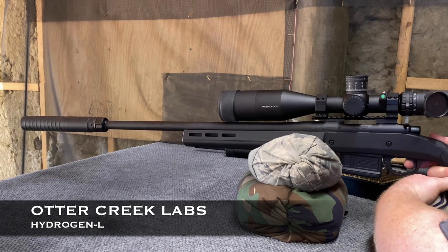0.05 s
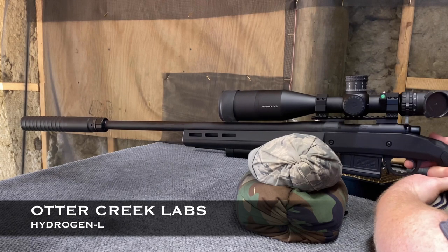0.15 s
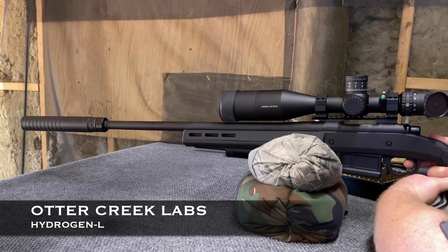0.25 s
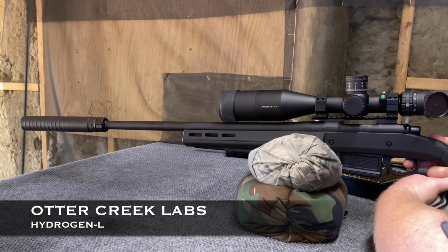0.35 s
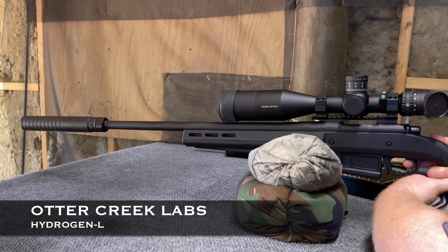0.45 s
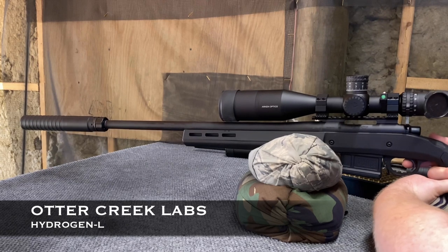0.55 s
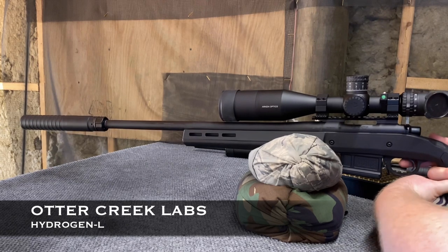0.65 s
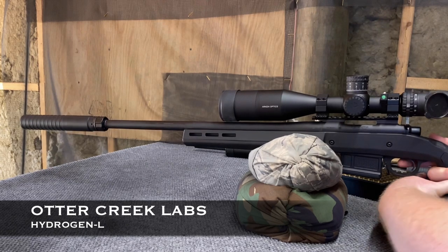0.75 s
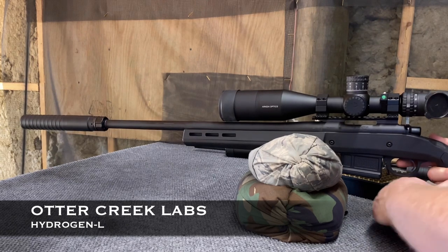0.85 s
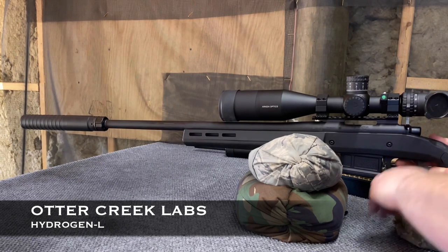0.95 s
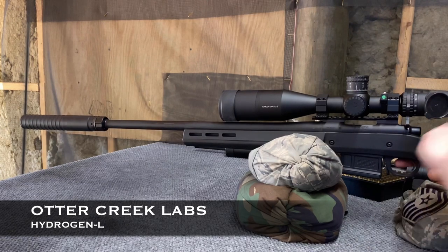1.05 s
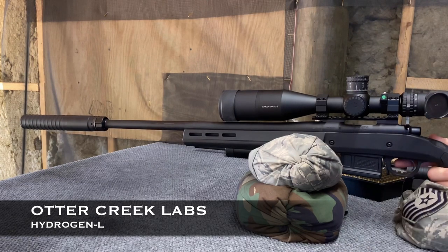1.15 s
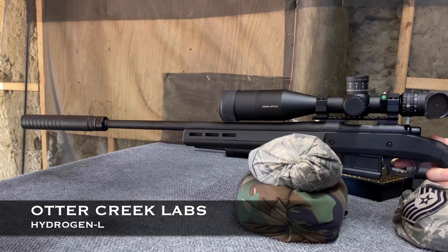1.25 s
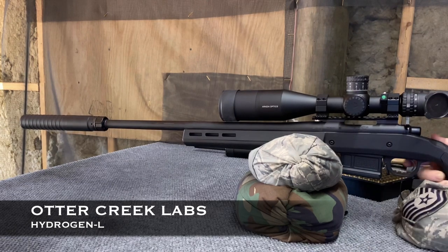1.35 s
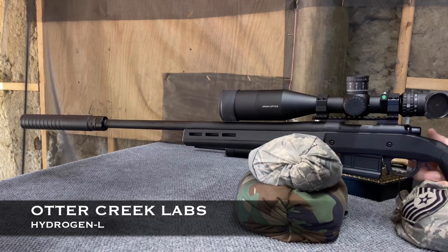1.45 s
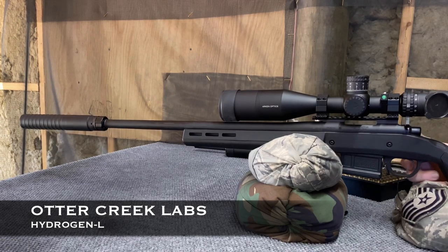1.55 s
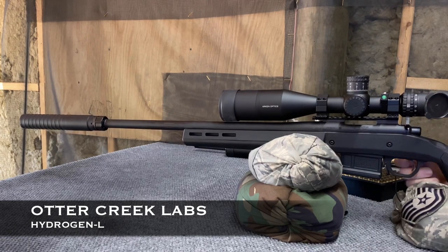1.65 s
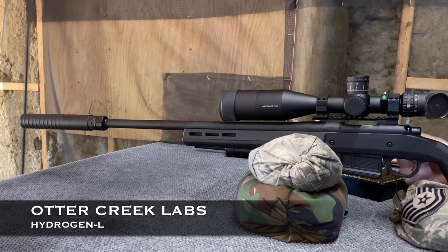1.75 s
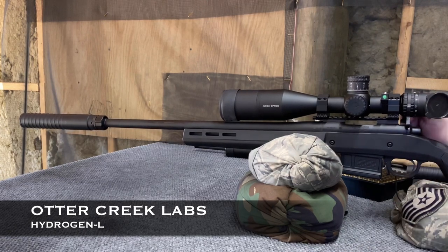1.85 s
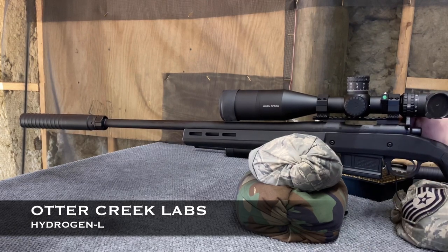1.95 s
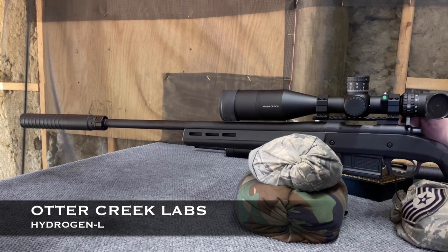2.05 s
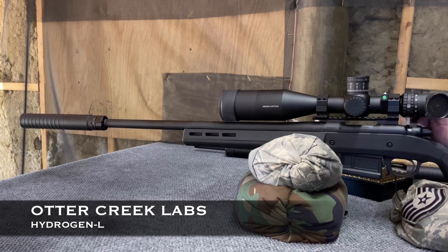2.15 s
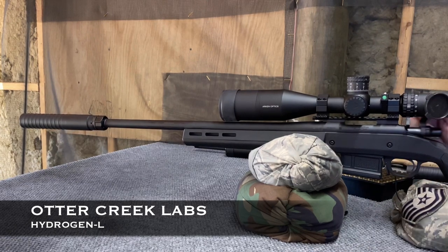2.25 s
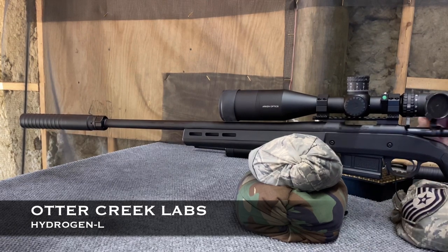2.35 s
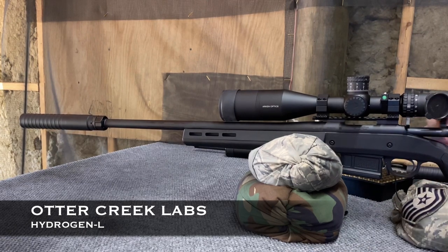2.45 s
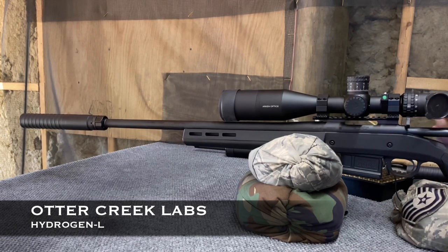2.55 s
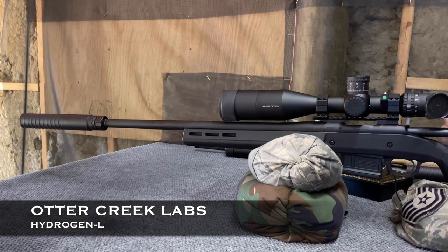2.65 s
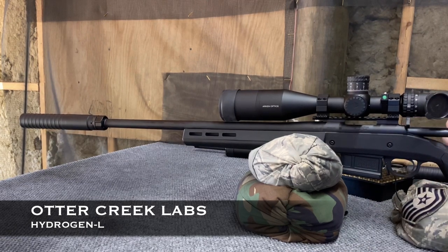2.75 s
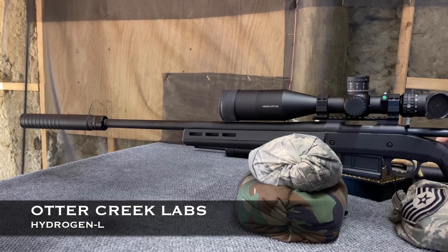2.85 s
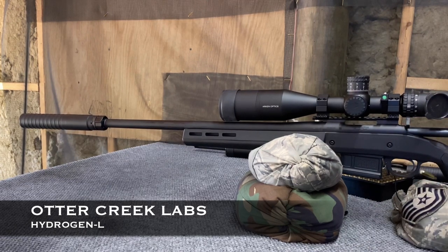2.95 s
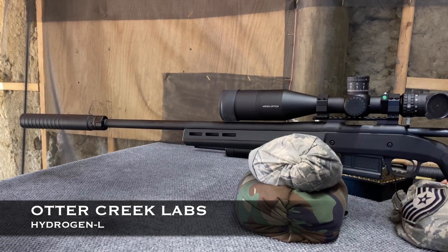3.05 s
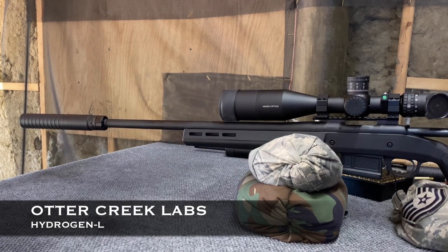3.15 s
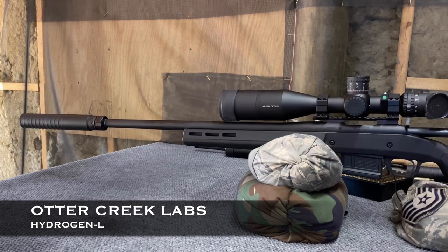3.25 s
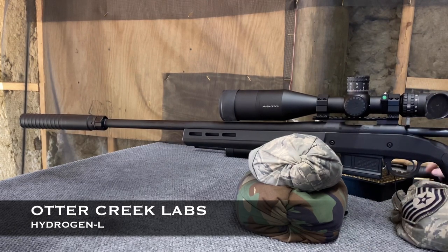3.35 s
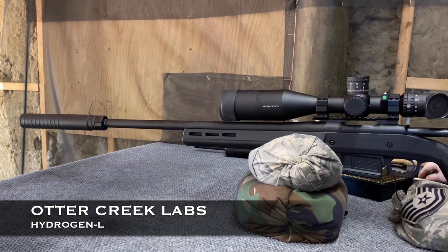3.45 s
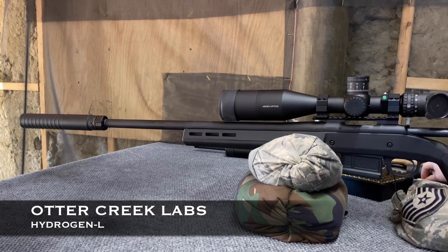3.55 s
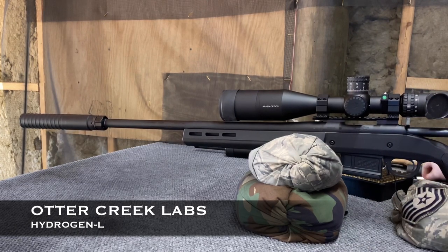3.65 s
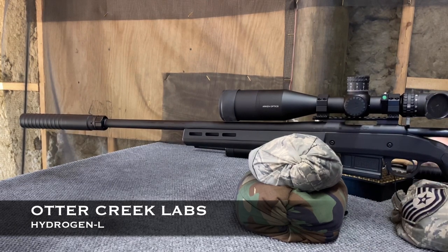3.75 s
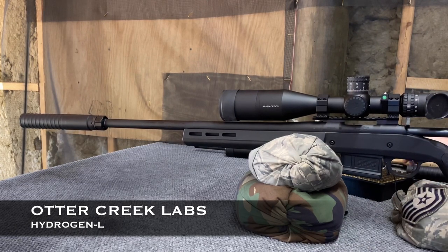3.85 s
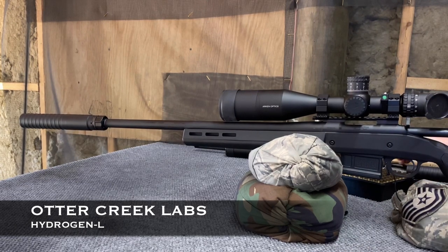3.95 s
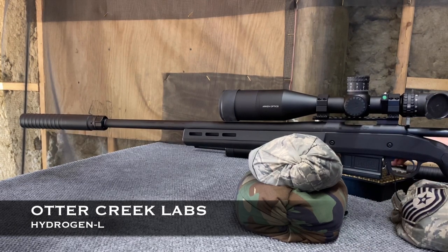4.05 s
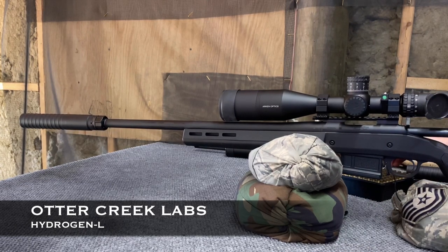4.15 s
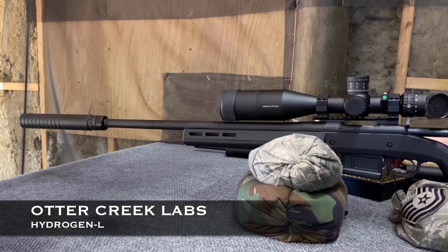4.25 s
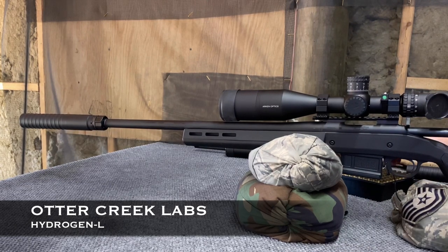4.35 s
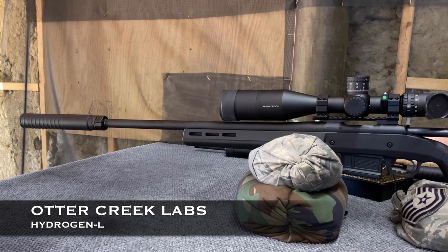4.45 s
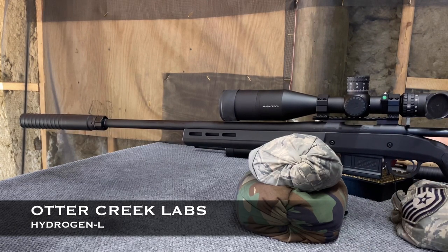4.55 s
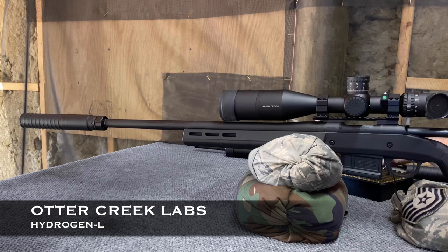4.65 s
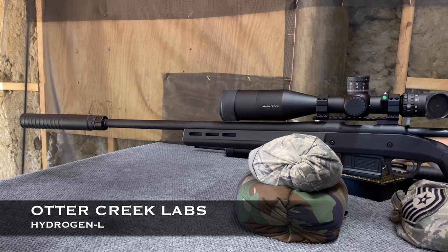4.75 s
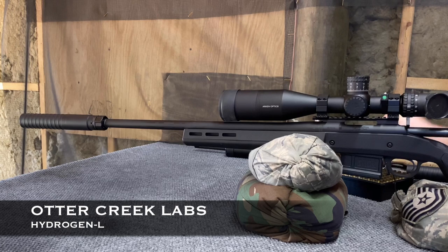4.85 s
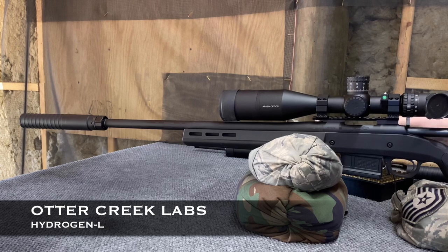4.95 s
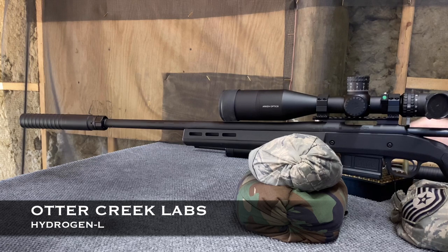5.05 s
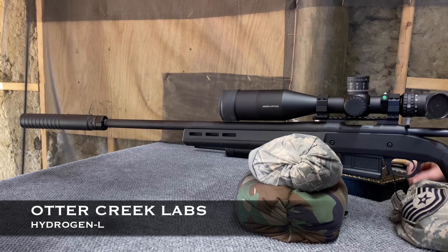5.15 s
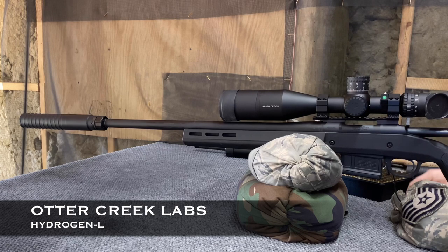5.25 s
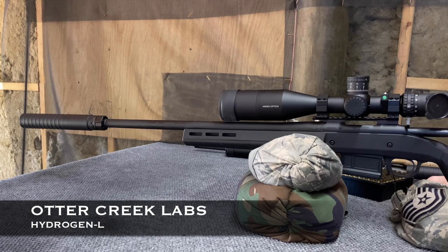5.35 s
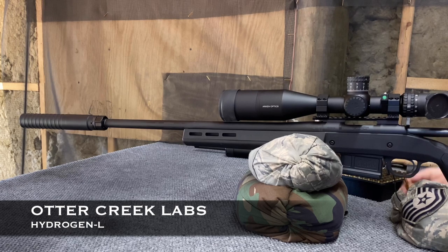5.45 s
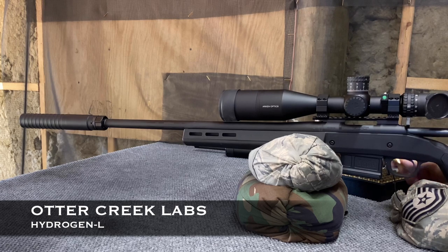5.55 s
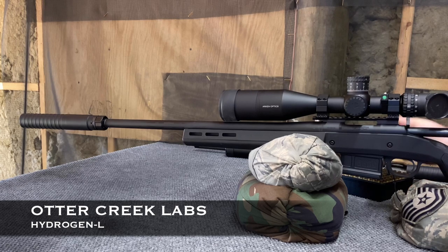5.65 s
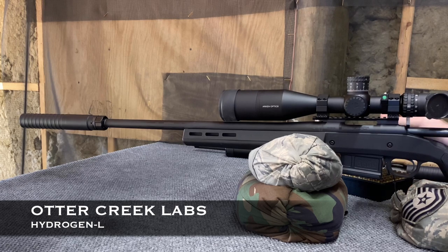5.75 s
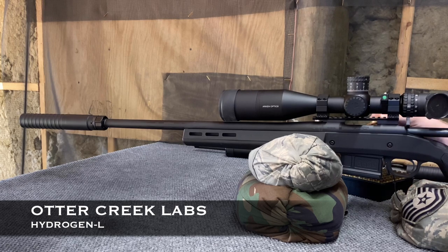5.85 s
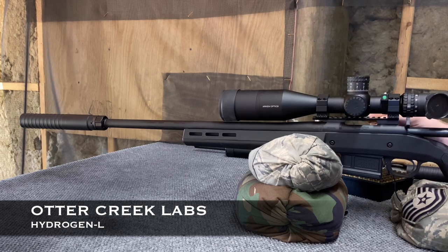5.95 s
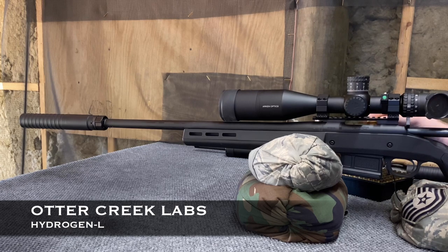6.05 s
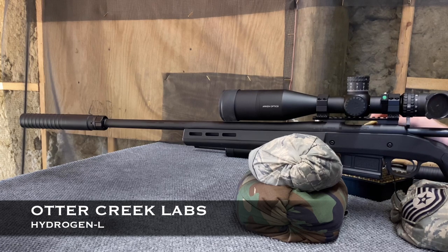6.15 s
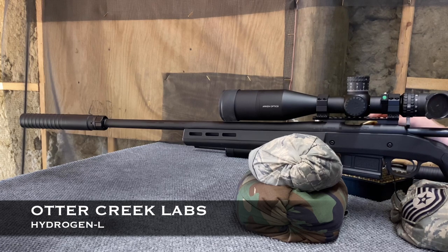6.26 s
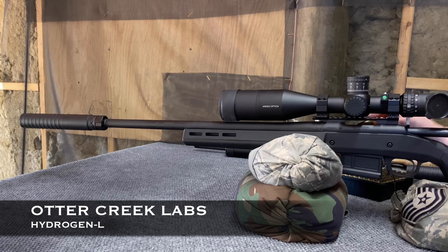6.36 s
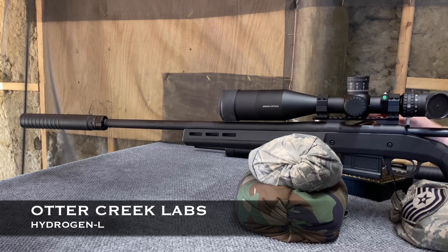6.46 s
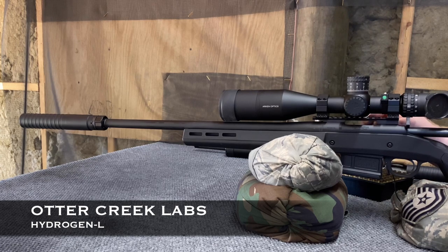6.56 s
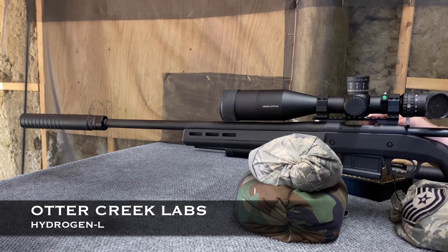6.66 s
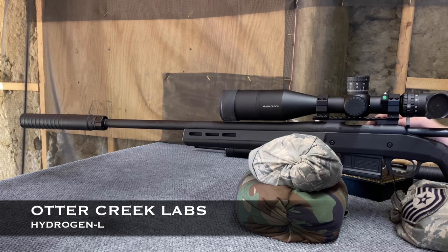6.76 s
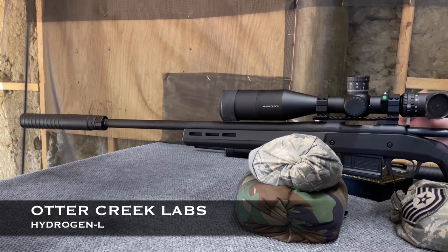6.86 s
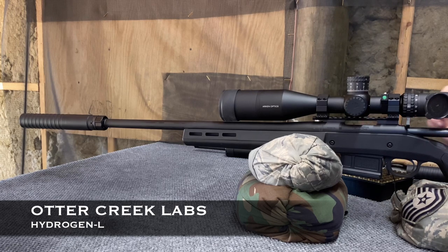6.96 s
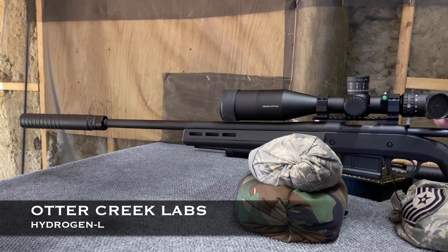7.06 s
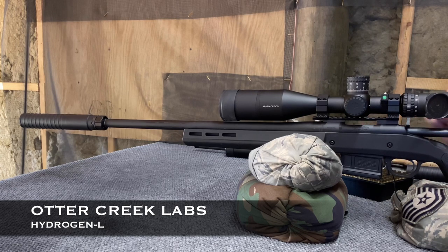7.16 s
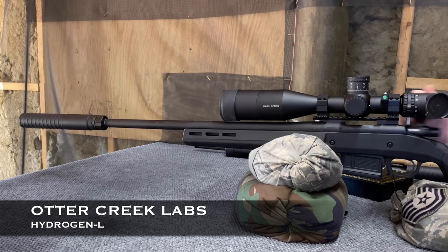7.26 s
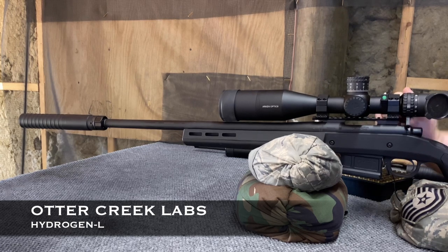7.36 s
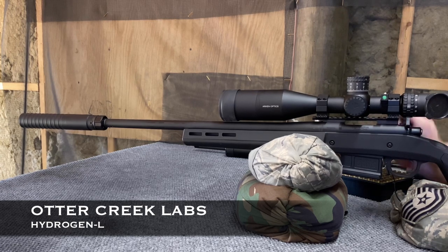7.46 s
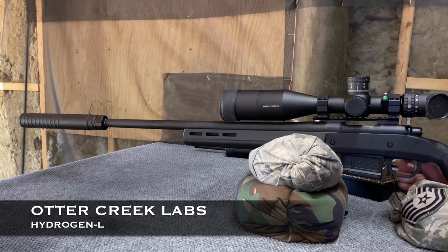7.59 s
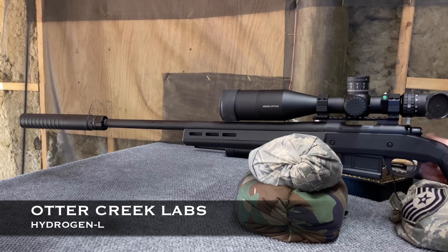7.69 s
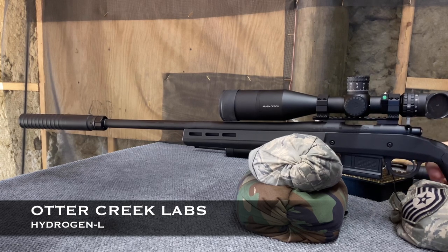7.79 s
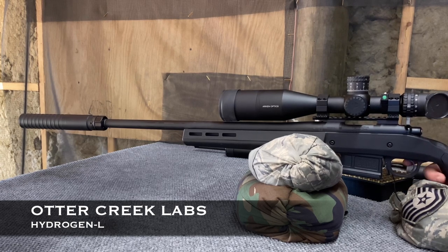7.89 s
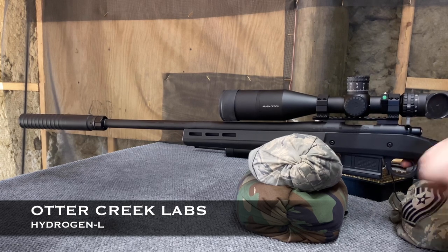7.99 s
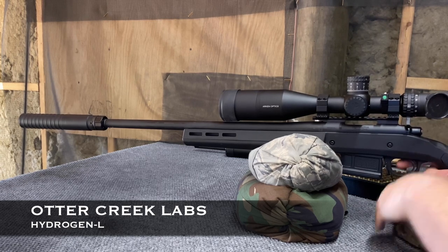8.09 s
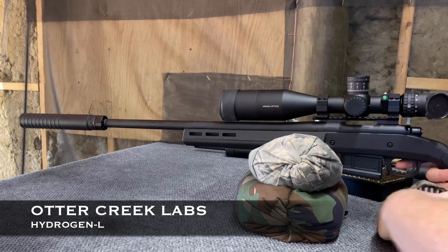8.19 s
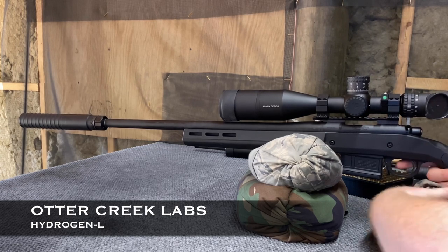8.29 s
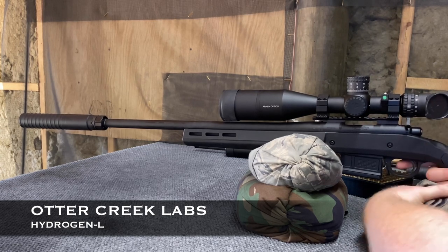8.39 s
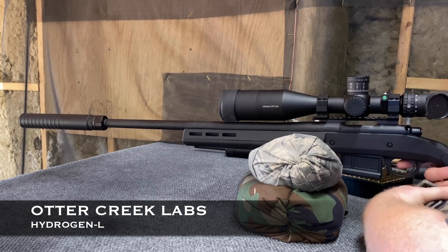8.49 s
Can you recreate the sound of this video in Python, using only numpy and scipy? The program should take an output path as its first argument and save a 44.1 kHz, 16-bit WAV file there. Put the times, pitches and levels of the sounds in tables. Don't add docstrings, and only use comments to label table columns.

```python
import sys
import numpy as np
from scipy import signal
from scipy.fft import rfft, irfft, next_fast_len
from scipy.io import wavfile
from scipy.ndimage import uniform_filter1d

SR = 44100
rng = np.random.default_rng(int(sys.argv[2]) if len(sys.argv) > 2 else 0)


def int16_out(signal):
    q = np.round(np.clip(np.atleast_2d(signal).T, -1, 1) * 32767)
    wavfile.write(sys.argv[1], SR, q.astype(np.int16))


def voltage_ratio(level):
    return 10 ** (np.asarray(level, float) / 20)


N = 375985

# start in seconds, steel, stock and tick levels in dB, steel pitch in Hz.
OPENING = [(1.6675, -32.5, -34.5, -45.5, 2360), (1.7578, -20.5, -28.5, -23.5, 2620),
           (1.7655, -8, -22.5, -18.5, 3000), (1.9893, -18, -29.5, -20.5, 3000),
           (2.2618, -15.5, -26.5, -27.5, 2400), (2.2652, -22, -35, -30.5, 3540),
           (2.2842, -11, -39.5, -14.5, 2320), (2.2875, -26, -36, -26, 5800),
           (2.4265, -19.5, -32, -38, 5400), (2.4733, -19, -36, -35.5, 3100), (2.586, -18, -26, -16, 5310),
           (2.6662, -13, -5.5, -23, 2060), (2.6745, -24, -14, -42, 2300), (2.6855, -32.5, -28, -51.5, 2290),
           (2.6992, -46, -20.5, -60.5, 2100), (2.719, -52, -35.5, -64, 2300),
           (2.9492, -40.5, -35.5, -70, 3302)]
FEEDING = [(4.1842, -41.5, -26, -50.5, 5650), (4.3772, -48, -32, -59.5, 5850),
           (4.7112, -49.5, -39, -56, 3980), (4.7295, -51, -34, -38, 6600), (4.7352, -21, -7, -33.5, 5000),
           (4.7512, -40, -34, -36, 5400), (4.7592, -49, -21, -52, 2900), (4.8332, -50.5, -42.5, -62, 2800)]
CLOSING = [
    (6.036, -43.5, -55, -49.5, 2990),
    (6.0545, -51.5, -60, -48, 3030),
    (6.2992, -30.5, -41, -56, 2260),
    (6.463, -49.5, -40.5, -63.5, 3000),
    (6.4685, -15, -6.5, -30, 3160),
    (6.474, -39, -18.5, -34, 2300),
    (6.4802, -29.5, -38, -39.5, 4550),
    (6.493, -38, -20, -41, 2900),
    (6.505, -51, -54.5, -60, 3000),
]
LOCKING = [(7.1055, -24, -39.5, -16.5, 2610), (7.154, -46, -47.5, -21.5, 3000),
           (7.1712, -12.5, -26, -21.5, 2690), (7.217, -30, -39.5, -28, 4500),
           (7.2287, -4.5, -20.5, -3.5, 2950), (7.2303, 0.5, -17.5, -7, 5810),
           (7.2312, -13, -21, -19.5, 3313), (7.2402, -31, -32, -25.5, 2400),
           (7.3442, -34.5, -40, -49, 2900), (7.3735, -15.5, -38, -18.5, 2970),
           (7.3795, -21, -47, -41.5, 2486), (7.4455, -4, -13, -18.5, 3050),
           (7.4665, -48, -32.5, -51.5, 3000)]
# start in seconds, level in dB.
TOUCHES = [
    (1.7422, -32.5),
    (2.2162, -41),
    (2.4452, -27.5),
    (2.6152, -36),
]
# start in seconds, level in dB.
SCUFFS = [(4.1423, -31), (4.1555, -34.5), (4.1903, -41), (4.1968, -30.5), (4.203, -53), (4.2235, -37),
          (4.2274, -30.5), (4.2354, -38), (4.249, -54), (4.2689, -32), (4.286, -50.5), (4.3338, -40.5),
          (4.3575, -41.5), (4.365, -47), (4.383, -42), (4.416, -47.5), (4.4541, -60), (4.508, -64.5),
          (4.5266, -50), (4.54, -51), (4.5542, -41), (4.563, -41), (4.573, -44), (4.592, -52.5),
          (4.619, -52.5), (4.6626, -48), (4.6874, -52), (4.699, -45), (5.1125, -46.5)]
# start in seconds, level in dB.
RATTLE = [(7.0592, -41), (7.0702, -34), (7.0872, -35), (7.112, -33), (7.1212, -26.5), (7.134, -27.5),
          (7.1402, -25.5), (7.1462, -25.5), (7.1532, -44), (7.1612, -29.5), (7.1662, -24.5),
          (7.1772, -24.5), (7.1832, -29.5), (7.194, -33), (7.1992, -34.5), (7.209, -29.5), (7.2162, -26)]
# steel, stock and tick levels in dB, then steel pitch in Hz.
TOUCH_MIX = [0.5, -21, -31.5, 2999.5]
SCUFF_MIX = [-20, 2.5, -29.5, 5601]
RATTLE_MIX = [3, -6.5, -16.5, 2795]
# frequency in Hz, level in dB per Hz.
STEEL = [(1350, -31), (2100, -3), (3000, 1.5), (4300, -1.5), (5800, -5), (7200, -17), (9100, -35.5),
         (15400, -120)]
EDGES = [(4120, -35), (7000, -12), (7820, 0.5), (9660, -3), (10600, -3), (12000, -3.5), (14500, -10.5),
         (15100, -10.5), (16000, -40)]
# frequency in Hz, level in dB per Hz.
STOCK_OPENING = [(290, -61.5), (500, -25.5), (899, 1.5), (970, -15.5), (1070, -5), (1470, -6.5), (1730, -8),
                 (2130, -4.5), (2600, -13), (3380, -35), (5720, -120)]
STOCK_FEEDING = [(290, -79.5), (500, -28), (711, -18), (1230, 1.5), (1430, -22.5), (1700, -2.5),
                 (1930, 3.5), (2160, -12.5), (2600, -24), (3380, -29.5), (5720, -120)]
STOCK_CLOSING = [(290, -59), (560, -35), (620, -7), (680, 2.5), (990, -6), (1400, -25), (2040, -20),
                 (2600, -6), (3380, -6), (5720, -120)]
STOCK_LOCKING = [(290, -48), (500, -5.5), (619, -7.5), (788, -4), (1100, -9.5), (1590, -7.5), (1840, -8.5),
                 (2600, -9.5), (3380, -24.5), (5720, -120)]
ACTION_HZ = [2250, 2600, 3020, 3660, 4550, 5520, 6170]
# frequency in Hz, level in dB, time to fall 60 dB in seconds.
HOLLOW = [(691, 1.5, 0.1), (802, -6.5, 0.034), (964, -2, 0.057), (1070, 1, .05), (1220, 0, .07),
          (1620, -4.5, .07), (1740, -3, .09), (1768, -2, 0.12), (1850, 2.5, 0.089), (1960, -0.5, 0.044),
          (2060, -1.5, 0.058), (2200, 2.5, .04), (2400, -4, .035), (2600, -6.5, .04)]
# start in seconds, level in dB, liveliest pitch in Hz.
KNOCKS = [(1.766, -25.5, 754), (2.262, -29.5, 640), (2.2825, -29.5, 2270), (2.6665, -11, 1930),
          (2.667, -22, 1130), (2.675, -9.5, 1930), (2.686, -25, 1980), (2.698, -25.5, 1070),
          (2.699, -20.5, 1970), (2.7199, -33.5, 2150), (2.737, -44, 1850), (2.757, -43.5, 1930),
          (2.76, -47.5, 1100), (4.508, -52.5, 1200), (4.5248, -51.5, 1730), (4.5515, -43, 1874),
          (4.5685, -46, 1750), (4.585, -52.5, 2000), (4.6637, -51, 1810), (4.69, -51, 1900),
          (4.699, -48.5, 1950), (4.7114, -46.5, 1850), (4.7372, -9.5, 1850), (4.7367, -14.5, 1176),
          (4.7604, -31.5, 1674), (6.47, -22, 757), (6.4811, -25.5, 794.5), (6.494, -25, 815),
          (7.175, -26, 2120), (7.183, -28, 1720), (7.222, -32, 2286), (7.2255, -30.5, 2500),
          (7.233, -20.5, 2200), (7.236, -20, 833), (7.4465, -22.5, 964)]
RING_HZ = [10810, 14350, 14620, 15000, 5410, 6128, 3400, 10800, 13700, 15000, 12700, 7600]
# time to fall 60 dB in seconds, then a list of start in seconds and peak in dB.
RINGS = [(0.2, [(2.2, -70.5), (2.2618, -28.5), (2.2845, -40.5), (2.4262, -43), (2.6662, -23.5),]),
         (0.13, [(2.4262, -41), (2.4732, -28.5), (2.6662, -28)]), (.14, [(2.6662, -34.5), (4.1562, -49),
         (4.7352, -61)]), (.2, [(1.886, -62.5), (2.6662, -29)]), (0.078, [(4.0872, -49), (4.1412, -51),
         (4.2282, -46.5), (4.7512, -58), (6.0242, -25), (6.0582, -35), (6.0782, -59), (6.2992, -43),
         (6.3522, -55.5), (6.4682, -35), (6.4802, -38), (6.4942, -40.5), (6.5192, -43), (6.5316, -56),
         (6.5436, -43.5), (6.5553, -57), (7.1062, -21), (7.121, -32.5), (7.147, -38), (7.174, -36),
         (7.199, -39.5)]), (.18, [(7.2292, -29)]), (.12, [(1.7662, -34)]), (0.04, [(2.2843, -6.5)]),
         (0.025, [(2.2622, -22.5), (2.2845, -20)]), (.03, [(2.2622, -24.5), (2.2875, -33)]),
         (.025, [(7.182, -26.5)]), (0.0085, [(6.025, -21.5), (6.059, -34), (6.079, -34), (7.374, -20)])]
# pitch ratio, level in dB, ratio of ringing times.
SPLIT = [
    (1, 0, 1),
    (1.012, -8, .7),
    (.987, -9, .4),
    (1.025, -12, .3),
]
# start in seconds and dB, then end in
# seconds and dB.
SLIDES = [
    [(1.77, -56), (1.9, -76)],
    [(2.3, -59), (2.42, -66)],
    [(2.68, -45.5), (2.78, -72.5)],
    [(2.48, -68), (2.58, -68.5)],
    [(7.38, -65.5), (7.44, -60)],
    [(6.48, -85), (6.58, -61.5)],
]
# time in seconds, level in dB.
RAM = [
    (7.05, -69.5),
    (7.16, -38),
    (7.174, -20.5),
    (7.195, -35.5),
    (7.215, -42),
    (7.229, -37.5),
]
CASE_HZ = [4490, 8791, 9889, 10273, 10790, 11120, 11500, 12980, 14390, 15230]
# level in dB, time to fall 60 dB in seconds.
CASE = [(-24.5, 0.158), (-13.5, 0.52), (-15, 0.15), (-0.5, 0.47),  (-22, 0.13), (-21, 0.43), (-13, 0.11),
        (-34, 0.44), (-31, 0.12), (-38, .12)]
# start in seconds, level in dB, liveliest pitch in Hz.
THUMPS = [
    (1.769, -40, 254),
    (2.266, -42, 520),
    (2.6695, -22.5, 339.7),
    (4.74, -29, 391),
    (5.104, -35.5, 400),
    (5.1124, -23, 400),
    (5.1196, -20, 310),
    (6.472, -44.5, 258),
    (7.232, -38.5, 298),
    (7.451, -34, 300),
]
# frequency in Hz, level in dB, time to fall 60 dB in seconds.
BENCH = [(228, -5, 0.065), (288, -7, 0.15), (330, -5.5, 0.097), (396.7, -2.5, 0.08), (540, -11.5, 0.12)]
FRAME = [(104, -3.5, 0.091), (171, -3.5, 0.34)]
# peak time in seconds, rise in seconds, rustle in dB, sheen in dB.
CLOTH = [(.78, 0.24, -75, -70.5), (1.252, 0.16, -86, -70), (1.601, 0.42, -79, -79),
         (2.03, 0.17, -69.5, -73), (4.374, 0.028, -79, -81), (4.7, 0.082, -73, -88),
         (6.33, 0.18, -75, -104), (6.642, 0.48, -76, -104), (7.744, 0.16, -59.5, -64),
         (7.877, 0.16, -63.5, -68.5), (7.605, .03, -95, -73), (7.965, .025, -83.5, -68),
         (8.116, 0.097, -65.5, -64), (8.232, 0.31, -71.5, -81), (8.5, 0.39, -73.5, -71)]
# frequency in Hz, level in dB per Hz.
SLEEVE = [(410, -33), (700, -11.5), (1000, -13), (1290, -1), (1880, 1), (2920, -7), (4520, -8.5),
          (8000, -26), (10400, -57.5), (17600, -120)]
SHEEN = [(4410, -37.5), (7500, -4), (10500, -9), (11400, -3), (12200, -24.5), (12800, -11), (14200, -8),
         (15500, -16.5)]
# peak time in seconds, peak in dB, rise in seconds.
SETTLING = [
    (.7, -62.5, 0.23),
    (1.301, -72, 0.35),
    (2.3, -70.5, 0.31),
    (6.72, -64, 0.47),
    (7.15, -56, 0.12),
]
# frequency in Hz, level in dB per Hz.
SAND = [(150, -22.5), (230, -3.5), (420, 3), (700, -0.5), (1000, -13.5), (1400, -31)]
# left delay in ms, right delay in ms, level in dB.
MIRRORS = [
    (1.3, 1.9, -21),
    (2.9, 2.3, -23.5),
    (4.1, 4.7, -19.5),
]
# frequency in Hz, likeness from 0 to 1.
LIKENESS = [(60, 0.36), (300, 0.93), (700, 0.69), (1500, 0.63), (3000, 0.69), (6000, 0.1), (15000, 0.22)]
# frequency in Hz, phase in radians.
LEFT_LEAD = [(0, 0), (130, -.7), (300, -1.5), (550, -2.1), (700, -4.2), (1300, -6.1), (2200, -7),
             (3100, -8), (5400, -7.5), (6130, -6.1), (7200, -6), (8790, -11.1), (10270, -13.1),
             (16200, -22)]
# frequency in Hz, level in dB.
LEFT_EXTRA = [(60, -2), (170, -3), (330, 2), (700, -6), (1300, -3), (2000, -1), (3000, 3), (5000, 0),
              (6500, -4), (8800, 2), (15000, 0)]
# frequency in Hz, level in dB per Hz.
ECHO = [(88, -20), (150, -18), (285, 2), (406, -22), (543, 1), (1160, -1), (2030, 1.5), (3450, -15),
        (5160, -55), (5410, -58), (7000, -51), (9100, -74), (15400, -120)]
# peak time in seconds, peak in dB, rise in seconds.
HUM = [
    (.6, -66.5, 1.3),
    (3, -68, 2.1),
    (5.5, -63, 0.81),
    (6.6, -71, .8),
    (8.2, -69.5, 1.3),
]
# peak time in seconds, peak in dB, rise in seconds.
SWELLS = [
    (.2, -62, 1.4),
    (1.85, -56, 0.52),
    (2.7, -56.5, 0.85),
    (4.25, -60.5, 0.32),
    (5.35, -70, 1),
    (7.24, -58.5, 0.15),
    (7.45, -51.5, 0.19),
    (8.2, -53.5, 1.57),
]
# frequency in Hz, level in dB per Hz.
RUMBLE = [(35, -40), (60, -8), (151, -3), (186, -25), (234, -9.5), (271, -21.5), (349, -16), (440, -17),
          (531, -1.5), (577, -14), (727, -14), (1080, -21.5), (1360, -15), (2670, -49.5), (9000, -58.5),
          (11700, -84.5), (19800, -120)]
# peak time in seconds, peak in dB, rise in seconds.
GUSTS = [
    (0.0, -51, 0.093),
    (1.8, -57, 0.33),
    (1.99, -54, 0.2),
    (4.13, -66.5, 0.29),
    (4.95, -65.5, 0.5),
    (7.471, -44.5, 0.14),
    (7.7, -65.5, 0.36),
    (8.53, -47.5, 0.21),
]
# frequency in Hz, level in dB per Hz.
WIND = [(12, -51), (20, -34), (49, -2.5), (113, -6), (146, -6), (200, -18.5), (260, -37.5), (440, -120)]


def clack(spectrum, rise_ms, t60, tail_db, tail_t60, spread_db, pitch_hz=None):
    size = 8192
    t = np.arange(size) / SR
    hz = np.arange(1, size // 2 + 2) * SR / size
    knots = np.geomspace(500, 16000, 30)
    colour = at_hz(spectrum, hz)
    grip = at_hz(np.transpose([knots, spread_db * rng.standard_normal(len(knots))]), hz)
    if pitch_hz:
        grip = grip + 9 * np.exp(-(np.log(hz / pitch_hz) / 0.09) ** 2)
        grip = grip + 6.5 * sum(np.exp(-(np.log(hz / mode_hz) / 0.035) ** 2) for mode_hz in ACTION_HZ)
    rise = 1 - np.exp(-(t * 1000 / rise_ms) ** 2)
    burst = rfft(rng.standard_normal(size) * rise * voltage_ratio(-60 * t / t60))
    even = np.sqrt(uniform_filter1d(np.abs(burst) ** 2, size=50))
    burst = irfft(burst / even * voltage_ratio(colour + grip))
    burst = burst * (1 - np.exp(-(t * 2000 / rise_ms) ** 2)) * (t < 0.1)
    smooth = uniform_filter1d(voltage_ratio(at_hz(spectrum, knots)), size=4)
    blur = at_hz(np.transpose([knots, smooth]), hz) * (hz > 400) * (hz < 16500)
    wash = rms_one(irfft(rfft(rng.standard_normal(size)) * blur))
    wash = wash * rise * voltage_ratio(tail_db - 7.5 - 60 * t / tail_t60)
    return burst / np.sqrt(np.sum(burst ** 2) / (t60 * SR)) / 8 + wash


def contacts(table, stock, steel_t60, stock_t60, tick_t60, tail_db, tail_t60, edge_tilt_db):
    out = np.zeros(N)
    edges = [(hz, db + edge_tilt_db * np.log2(hz / 8000)) for hz, db in EDGES]
    for s, steel_db, stock_db, tick_db, pitch_hz in table:
        steel = clack(STEEL, 0.84, steel_t60, tail_db, tail_t60, spread_db=2, pitch_hz=pitch_hz)
        plastic = clack(stock, 1.1, stock_t60, tail_db + 3, tail_t60 * 0.39, spread_db=4)
        tick = clack(edges, 0.76, tick_t60, tail_db - 7.5, tail_t60 * 0.7, spread_db=6.5)
        add(out, s, voltage_ratio(steel_db) * steel)
        add(out, s, voltage_ratio(stock_db) * plastic)
        add(out, s, voltage_ratio(tick_db + 2.5) * tick)
    return filtered(out, 2, 450, "high")


def mixed(rows, mix):
    return [(s, *(db + np.array(mix[:3])), mix[3]) for s, db in rows]


def bounces(start, levels_db, gap_s, shrink, loss_db):
    k = np.arange(4)
    s = start + np.cumsum(gap_s * shrink ** (k - 1.0) * (k > 0))
    levels = levels_db - loss_db * np.outer(k, [1, 0.5, 1.3])
    pitch_hz = 2900 + 0 * k
    return np.column_stack([s, levels, pitch_hz]).tolist()


def action():
    opening = OPENING + mixed(TOUCHES, TOUCH_MIX)
    feeding = FEEDING + mixed(SCUFFS, SCUFF_MIX)
    drop = bounces(6.0242, (-22.5, -43.5, -26), gap_s=0.034, shrink=0.6, loss_db=6)
    chatter = bounces(6.5192, (-34, -29.5, -39.5), gap_s=0.0124, shrink=0.97, loss_db=8.5)
    seating = CLOSING + drop + chatter
    locking = LOCKING + mixed(RATTLE, RATTLE_MIX)
    out = contacts(opening, STOCK_OPENING, 0.017, 0.035, 0.0077, tail_db=-26.5, tail_t60=0.11, edge_tilt_db=2)
    out += contacts(feeding, STOCK_FEEDING, 0.016, 0.018, 0.015, tail_db=-19.5, tail_t60=0.18, edge_tilt_db=6.5)
    out += contacts(seating, STOCK_CLOSING, 0.016, 0.018, 0.01, tail_db=-22, tail_t60=0.15, edge_tilt_db=-7.5)
    out += contacts(locking, STOCK_LOCKING, 0.017, 0.035, 0.008, tail_db=-35.5, tail_t60=0.2, edge_tilt_db=2.5)
    return out


def hollow_stock():
    out, t = np.zeros(N), np.arange(6000) / SR
    fall = voltage_ratio(-14) + voltage_ratio(-60 * t / 0.018)
    body = modes(HOLLOW) * fall * (1 - np.exp(-(t / 0.0007) ** 2))
    mode_hz = np.array(HOLLOW)[:, 0]
    for s, db, hz in KNOCKS:
        luck = voltage_ratio(1.5 * rng.standard_normal(len(mode_hz)))
        lively = np.exp(-(np.log2(mode_hz / hz) / 0.16) ** 2) * luck
        sound = lively @ body
        add(out, s, voltage_ratio(db) * sound / np.abs(sound).max())
    return out


def thin_parts():
    out = np.zeros(N)
    rise = 1 - np.exp(-np.arange(12000) / 20)
    for hz, (t60, strikes) in zip(RING_HZ, RINGS):
        part = modes(np.array(SPLIT) * [hz, 1, t60], size=12000) * rise
        for s, db in strikes:
            add(out, s, voltage_ratio(db - 3 + 1.1 * rng.standard_normal(len(part))) @ part)
    return out


def slides():
    level = sum(voltage_ratio(in_time(rows)) for rows in SLIDES + [RAM])
    grains = rng.random(N) < 3000 / SR
    strength = voltage_ratio(1.9 * np.minimum(rng.exponential(1, N), 5))
    grit = grains * strength * rng.choice([-1, 1], N)
    colour = [(600, -30), (1500, -6), (2600, 1.9), (5500, -8), (8400, -20), (12700, -12), (16500, -30.5)]
    body = clack(colour, 0.44, 0.005, -39.5, 0.03, spread_db=1.5)
    return level * voltage_ratio(0.71 * drift(59.16)) * rms_one(signal.fftconvolve(grit, body)[:N])


def drag():
    s, db = np.transpose(SCUFFS)
    level = swells(s, db / 2 - 47, 0.02 + 0 * s, fall=2.3)
    grit = rng.standard_normal(N) ** 3
    body = clack(STOCK_FEEDING, 0.5, 0.01, -40, 0.03, spread_db=0)
    return level * rms_one(signal.fftconvolve(grit, body)[:N])


def brass_case():
    out, t, hz = np.zeros(N), np.arange(24000) / SR, np.array(CASE_HZ)[:, None]
    spin = np.cos(np.pi * 21.7 * (t - 0.0095)) ** 4
    steady = np.isin(hz, CASE_HZ[1:4:2])
    turned = np.minimum(t / 0.12, 1) * spin * ~steady
    wake_s = np.where(hz > 12000, 0.018, 0.0005)
    grow = 1 - np.exp(-(t / wake_s) ** 2)
    body = modes(np.column_stack([CASE_HZ, CASE]), size=24000) * np.exp(-(t / 0.52) ** 4)
    add(out, 2.9495, voltage_ratio(-23.5) * strike(body * grow * (1 - turned), contact_ms=0.0298, spread_db=0.23))
    return out


def bench():
    out, t = np.zeros(N), np.arange(6000) / SR
    swell = (1 - np.exp(-t / 0.00093)) * np.exp(-(t / 0.032) ** 2)
    for s, board_db, hz in THUMPS:
        octaves_away = np.abs(np.log2(np.array(BENCH)[:, :1] / hz))
        board = modes(BENCH) * voltage_ratio(-15 * octaves_away) * swell
        add(out, s, voltage_ratio(board_db + 2) * strike(board, contact_ms=0.085, spread_db=0.91))
        add(out, s, voltage_ratio(board_db - 7.5) * strike(modes(FRAME) * swell, contact_ms=0.11, spread_db=1.8))
    return filtered(out, 3, [70, 620], "band")


def sleeves():
    s, rise_s, rustle_db, sheen_db = np.transpose(CLOTH)
    rustle = swells(s, rustle_db, rise_s, fall=1.1) * voltage_ratio(9) * banded_noise(SLEEVE, patchy_db=2.6, rate=8.6)
    sheen = swells(s, sheen_db, rise_s, fall=1.1) * banded_noise(SHEEN, patchy_db=3, rate=12)
    sheen = filtered(sheen, 7, [11300, 12900], "stop")
    return rustle + filtered(sheen, 12, 15000, "low")


def sandbags():
    return swells(*np.transpose(SETTLING), fall=3.3) * banded_noise(SAND, patchy_db=2.5, rate=14)


def shed(x):
    size = next_fast_len(N + SR)
    w = 2 * np.pi * np.arange(size // 2 + 1) / size
    dull = 1 / np.sqrt(1 + (w * SR / (2 * np.pi * 2300)) ** 2)
    loops = []
    for lag_s in rng.uniform(0.0055, 0.025, 12):
        loss = voltage_ratio(-60 * lag_s / 0.12)
        loops.append(loss * dull * np.exp(-1j * w * lag_s * SR))
    sides = [sum((-1) ** k * g / (1 - g) for k, g in enumerate(loops[ear::2])) for ear in range(2)]
    return irfft(rfft(x, size) * np.array(sides), size)[:, :N]


def mirrors(x):
    out = np.zeros((2, N))
    thin = filtered(x, 2, 2200, "high")
    for left_ms, right_ms, db in MIRRORS:
        add(out[0], left_ms / 1000, voltage_ratio(db) * thin)
        add(out[1], right_ms / 1000, voltage_ratio(db) * thin)
    return out


def ports(x):
    size = next_fast_len(N + SR)
    hz = np.arange(size // 2 + 1) * SR / size
    half = voltage_ratio(at_hz(LEFT_EXTRA, hz + 1) / 2)
    turn = np.exp(1j * np.interp(hz, *np.transpose(LEFT_LEAD)))
    return irfft(rfft(x, size) * np.array([half * turn, 1 / half]), size)[:, :N]


def shot_echo():
    t = np.arange(N) / SR
    wash = banded_noise(ECHO, patchy_db=0.6, rate=9)
    bright = filtered(wash, 2, 2800, "high")
    wash = wash - bright * (1 - voltage_ratio(-25 * t))
    wash[0] = np.roll(wash[0], -19)
    barrel = voltage_ratio(-71 - 60 * t) * np.sin(2 * np.pi * 5090 * t)
    return voltage_ratio(-42 - 60 * t / 1.86) * wash + barrel


def near_hum():
    return wavering(540, 4, 6.4) * voltage_ratio(2 * drift(9)) * swells(*np.transpose(HUM), fall=1.2)


def far_rumble():
    level = voltage_ratio(-62.5) + swells(*np.transpose(SWELLS), fall=0.83)
    rumble = banded_noise(RUMBLE, patchy_db=2.5, rate=14)
    for hz, db, wander_hz in [(103, -8.5, 2), (177.5, -18.5, 7.9)]:
        rumble = rumble + voltage_ratio(db + 1.9 * drift(8.9)) * wavering(hz, wander_hz, 3.6)
    lull = 0.69 * np.exp(-((np.arange(N) / SR - 1.3) / 0.55) ** 2)
    upper = signal.sosfiltfilt(signal.butter(2, 620, "high", fs=SR, output="sos"), rumble)
    return level * (rumble - lull * upper)


def leaves():
    return voltage_ratio(-83.5) * banded_noise([(2500, -3.5), (7000, -5), (10000, -16)], patchy_db=2, rate=4.6)


def wind():
    level = voltage_ratio(-85.5) + swells(*np.transpose(GUSTS), fall=1.1)
    return level * banded_noise(WIND, patchy_db=3.5, rate=2.2)


def at_hz(points, hz):
    known_hz, value = np.transpose(points)
    return np.interp(np.log(hz), np.log(known_hz), value)


def in_time(rows):
    s, db = np.transpose(rows)
    return np.interp(np.arange(N) / SR, s, db, left=-140, right=-140)


def filtered(x, order, hz, kind):
    return signal.sosfilt(signal.butter(order, hz, kind, fs=SR, output="sos"), x)


def rms_one(x):
    return x / np.sqrt(np.mean(x ** 2) + 1e-20)


def drift(rate):
    r = np.exp(-80 * np.pi * rate / SR)
    slow = signal.lfilter([1], [1, -2 * r, r * r], rng.standard_normal(N // 40 + 2002))[2000:]
    return np.interp(np.arange(N) / 40, np.arange(len(slow)), rms_one(slow))


def wavering(hz, wander_hz, rate):
    return np.sin(2 * np.pi * np.cumsum(hz + wander_hz * drift(rate)) / SR)


def swells(times, db, rise_s, fall):
    t = np.arange(0, N + 64, 64) / SR - times[:, None]
    slope = 20 / rise_s[:, None]
    gain = voltage_ratio(db[:, None] - slope * np.where(t < 0, -t, t / fall)).sum(axis=0)
    return np.interp(np.arange(N) / 64, np.arange(len(gain)), gain)


def add(track, s, sound):
    i = round(s * SR)
    track[i:i + len(sound)] += sound[:N - i]


def modes(table, size=6000):
    hz, db, t60 = np.transpose(table)[:, :, None]
    t = np.arange(size) / SR
    return voltage_ratio(db - 60 * t / np.maximum(t60, 0.004)) * np.sin(2 * np.pi * hz * t)


def strike(body, contact_ms, spread_db):
    t = np.arange(160) / SR * 1000
    grit = rng.standard_normal(len(t)) * t * np.exp(-t / contact_ms)
    share = voltage_ratio(spread_db * rng.standard_normal(len(body))) * rng.choice([-1, 1], len(body))
    sound = signal.fftconvolve(share @ body, grit)
    return sound / np.abs(sound).max()


def banded_noise(spectrum, patchy_db, rate):
    out, together = 0, drift(1.5)
    edges = 25 * 2 ** (np.arange(29) / 3)
    white = rng.standard_normal((2, 2, N))
    for k, (low, high) in enumerate(zip(edges, edges[1:])):
        hz = np.sqrt(low * high)
        if spectrum[0][0] * 0.8 < hz < spectrum[-1][0] * 1.2:
            mid, side = filtered(white[k % 2], 2, [low, high], "band")
            alike = at_hz(LIKENESS, hz)
            gain = voltage_ratio(at_hz(spectrum, hz) + patchy_db * (together / 2 + drift(rate)))
            stereo = np.sqrt(1 + alike) * mid + np.sqrt(1 - alike) * side * [[1], [-1]]
            out = out + gain * stereo
    return rms_one(out)


def scene():
    rifle = action() + hollow_stock() + thin_parts() + slides() + drag() + brass_case() + bench()
    background = sleeves() + sandbags() + near_hum() + far_rumble() + leaves() + wind()
    return ports(rifle + background) + voltage_ratio(-15.5) * shed(rifle) + mirrors(rifle) + shot_echo()


def top_cut(x):
    return signal.sosfilt(signal.butter(12, 16650, fs=SR, output="sos"), x)


def record(dry):
    rounded = 0.9 * np.tanh(dry / 0.9)
    cut = signal.sosfilt(signal.cheby2(12, 70, 16800, fs=SR, output="sos"), rounded)
    return top_cut(cut)


dry = scene()
out = record(dry)
int16_out(out)
```